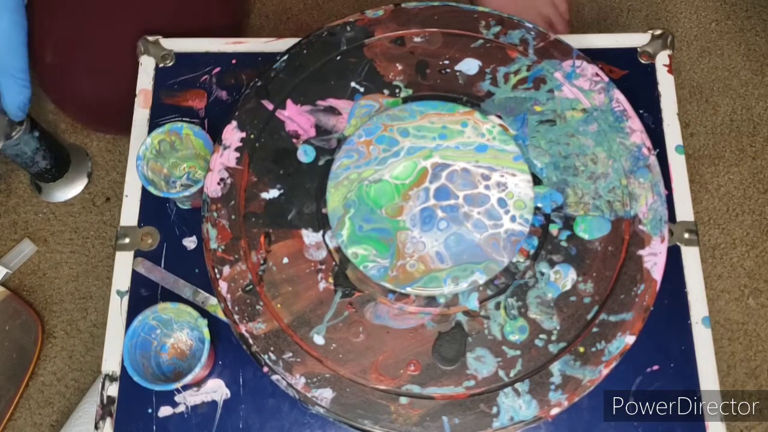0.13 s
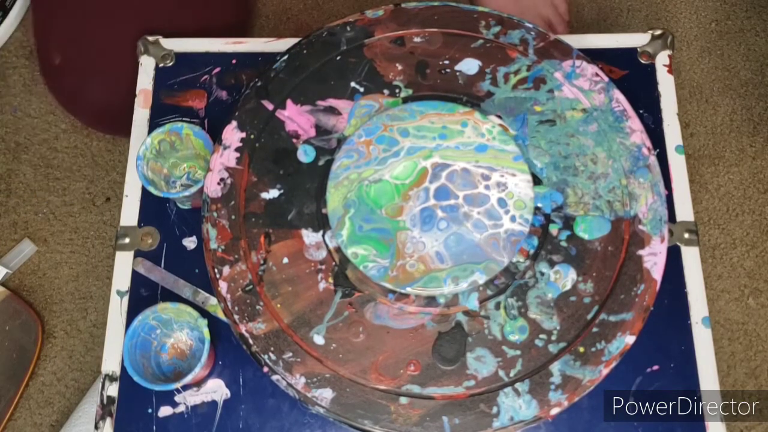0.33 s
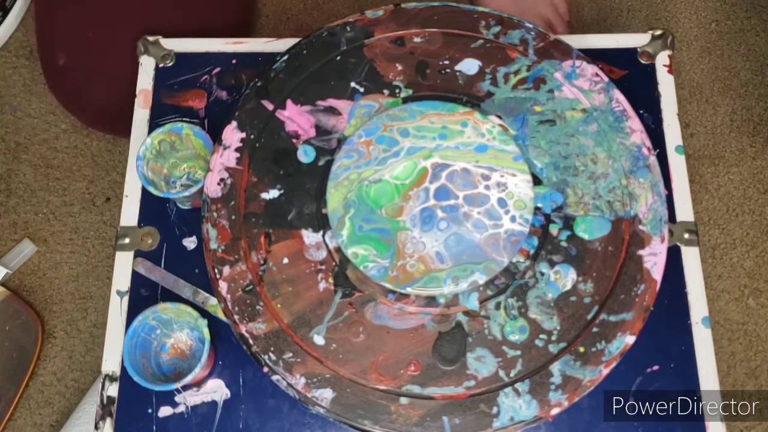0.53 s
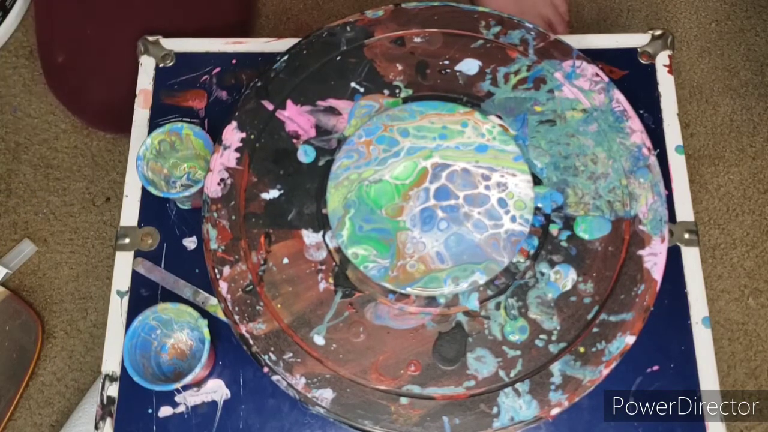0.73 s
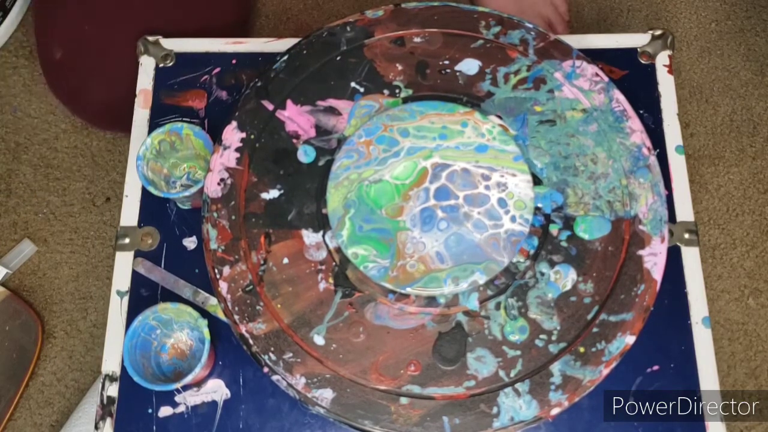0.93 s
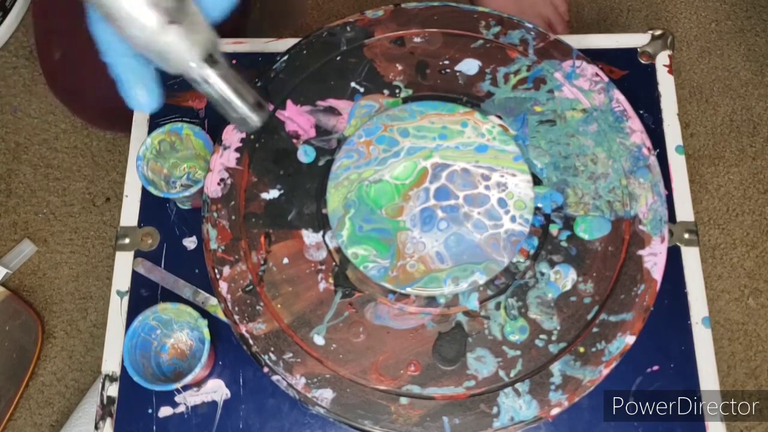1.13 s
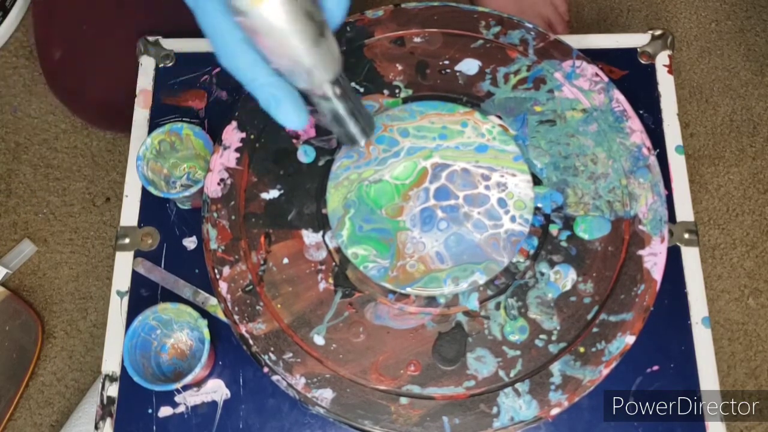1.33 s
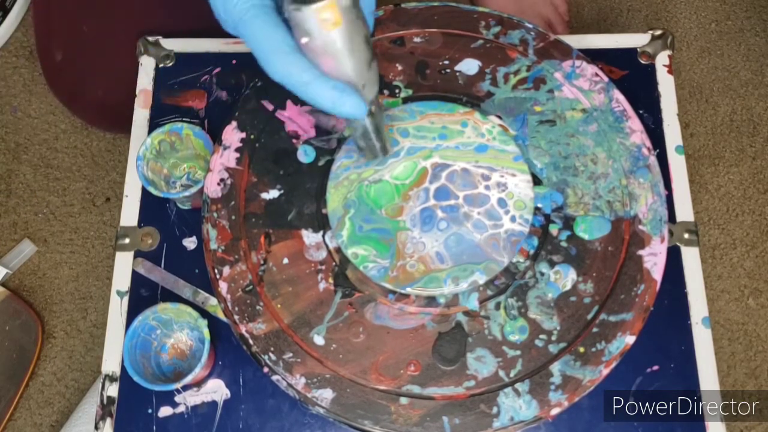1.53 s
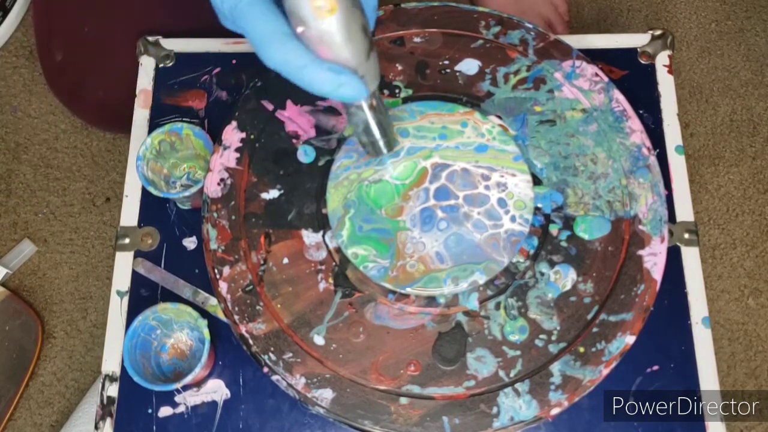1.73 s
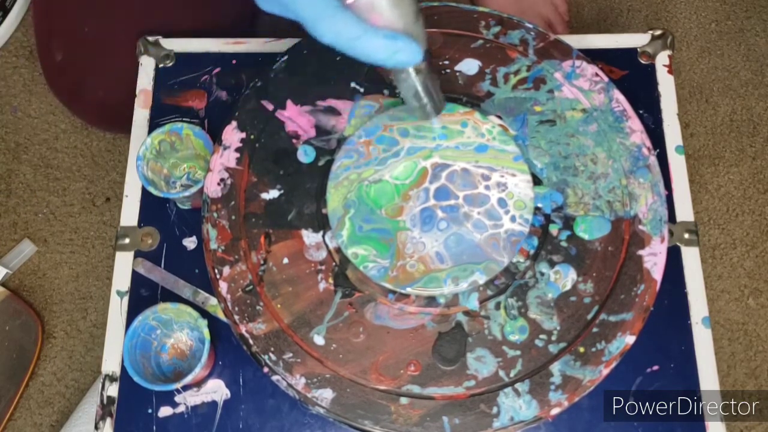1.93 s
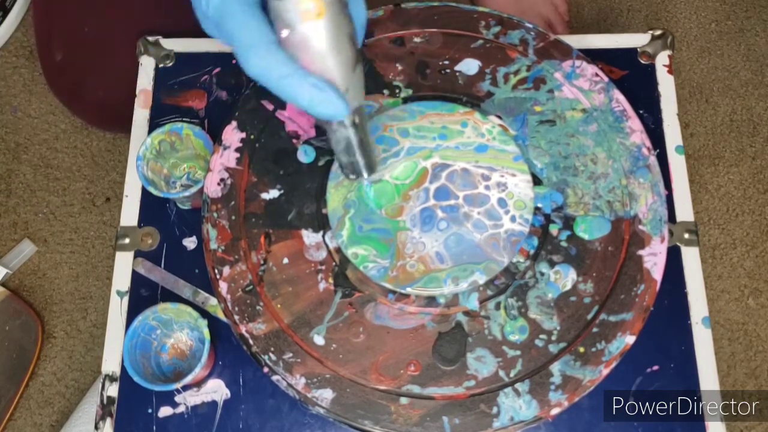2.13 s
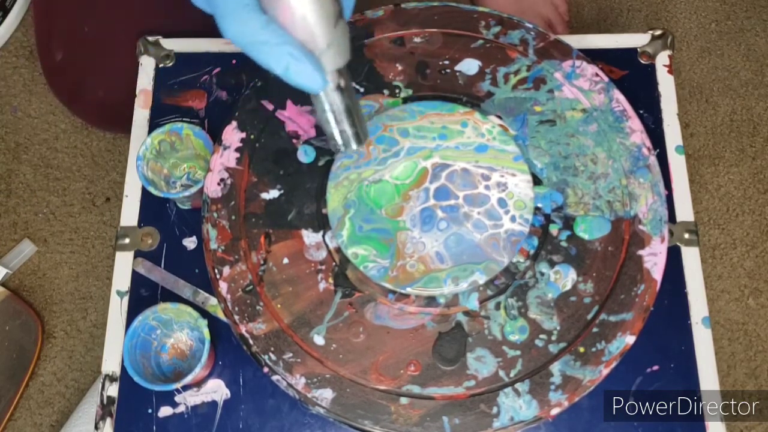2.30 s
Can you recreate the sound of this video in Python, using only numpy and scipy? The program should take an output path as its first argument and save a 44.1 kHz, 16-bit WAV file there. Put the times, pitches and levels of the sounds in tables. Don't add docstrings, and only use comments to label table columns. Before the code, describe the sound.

Gas torch ignition heard close in stereo: quiet handling rustle and tiny ticks first, then gas starts hissing, the igniter cracks loudly, the flame blows briefly and stops with plastic clicks, over faint low room hum.

```python
import sys
import numpy as np
from scipy import signal
from scipy.fft import rfft, irfft, next_fast_len
from scipy.io import wavfile

SR = 44100
rng = np.random.default_rng(int(sys.argv[2]) if len(sys.argv) > 2 else 0)


def gain_from_db(level_db):
    decades = np.asarray(level_db, float) / 20
    return 10 ** decades


def store_wav(level_fs):
    pcm = np.round(np.clip(np.atleast_2d(level_fs), -1, 1) * 32767)
    wavfile.write(sys.argv[1], SR, pcm.T.astype(np.int16))


N = 108574
FFT_N = next_fast_len(N)
T = np.arange(N) / SR

SNAP_S, CATCH_S = 1.7407, 0.026
TRIGGER_PAN_DB = 4.5
# (frequency [Hz], correlation [-1..1])
FLAME_LIKE = [(60, 0.71), (240, 1), (950, 0.92), (3770, 0.21), (15000, -0.19)]
# (frequency [Hz], left over right [dB])
SIDE_LEAN = [(1500, -0.5), (3000, -0.5), (6000, 3.5), (10000, -4.5)]


def rms_one(x):
    return x / np.sqrt(np.mean(x ** 2) + 1e-20)


def in_time(rows):
    s, *columns = np.transpose(rows)
    return [np.interp(T, s, c) for c in columns]


def at_hz(points, hz):
    table_hz, values = np.array(points).T
    return np.interp(np.log(hz), np.log(table_hz), values)


def drift(rate):
    r = np.exp(-80 * np.pi * rate / SR)
    white = rng.standard_normal(N // 40 + 2002)
    slow = signal.lfilter([1], [1, -2 * r, r * r], white)[2000:]
    return np.interp(np.arange(N) / 40, np.arange(len(slow)), rms_one(slow))


def pan(db):
    return gain_from_db(np.array([db / 2, -db / 2]).reshape(2, -1))


def noise(spectrum, like, lean=((1, 0), (2, 0))):
    hz = np.maximum(np.arange(FFT_N // 2 + 1) * SR / FFT_N, 5.)
    mid, side = rfft(rng.standard_normal((2, FFT_N)))
    c = np.clip(at_hz(like, hz), -1, 1)
    pair = np.sqrt(1 + c) * mid + np.sqrt(1 - c) * side * [[1], [-1]]
    coloured = pair * pan(at_hz(lean, hz)) * gain_from_db(at_hz(spectrum, hz))
    return rms_one(irfft(coloured, FFT_N)[:, :N])


def bands(x, low_hz, count):
    hz = np.maximum(np.arange(FFT_N // 2 + 1) * SR / FFT_N, 1.)
    f = rfft(x, FFT_N)
    place = np.clip(np.log2(hz / low_hz), 0, count - 1)
    slices = []
    for k in range(count):
        share = np.maximum(1 - abs(place - k), 0)
        slices.append((low_hz * 2 ** k, irfft(f * share, FFT_N)[:, :N]))
    return slices


def patchy(x, patchy_db, rate):
    shared = drift(rate)
    return sum(b * gain_from_db(patchy_db * (shared + drift(2 * rate)))
               for hz, b in bands(x, low_hz=125., count=8))


def resonate(x, hz, width):
    r = np.exp(-np.pi * width / SR)
    poles = [1, -2 * r * np.cos(2 * np.pi * hz / SR), r * r]
    return signal.lfilter([(1 - r * r) / 2, 0, (r * r - 1) / 2], poles, x)


def rub_tone(white, hz, width):
    return rms_one(resonate(resonate(white, hz, width), hz, width))


def swell_at(s, rise, fall):
    return np.exp(-((T - s) / np.where(T < s, rise, fall)) ** 2)


def ring(x, modes):
    out = 0
    for hz, db, t60 in modes:
        r, w = gain_from_db(-60 / (t60 * SR)), 2 * np.pi * hz / SR
        out = out + gain_from_db(db) * signal.lfilter([0, np.sin(w)], [1, -2 * r * np.cos(w), r * r], x + 1e-18)
    return out


def dying(start, t60):
    t = T - start
    return (t >= 0) * gain_from_db(-60 * np.maximum(t, 0) / t60)


def snap():
    # (frequency [Hz], level per Hz [dB])
    spectrum = [(88, -36), (150, -4), (673, -24), (1180, -8.5), (3390, -4.5), (3590, -7), (9710, -7),
                (12300, -1.5), (15800, 0)]
    # (frequency [Hz], left over right [dB])
    balance = [(60, -6), (550, -1.5), (1100, 4), (2500, 1), (6000, 7), (10000, 0)]
    # (frequency [Hz], correlation [-1..1])
    likeness = [(150, -0.81), (450, 0.9), (1100, 0.67), (2380, -0.053), (15000, -0.087)]
    # (frequency [Hz], decay t60 [s])
    tail_t60 = [(200, 0.33), (1000, 0.23), (3500, 0.28), (12000, 0.2)]
    # (frequency [Hz], level [dB], decay t60 [s], left over right [dB])
    body_modes = [(1530, 3, 0.03, 3), (2900, -6, 0.06, 0), (3660, -5, 0.1, 0), (6190, -9, .03, 7),
                  (7280, 0, 0.03, 8), (7950, -8, .03, 6), (11400, -9, 0.05, -2), (12650, -6, .05, -3),
                  (14800, -3, 0.015, 5)]
    # (time after the snap [s], level [dB])
    rebounds = [
        (.0062, -31),
        (0.0132, -23.5),
        (.0255, -29.5),
    ]
    # (frequency [Hz], level [dB], decay t60 [s])
    spike_modes = [(7400, 0, .012), (14600, -1, .006)]

    colour = noise(spectrum, likeness, balance)
    crack_t60, lead_s = 0.012, 0.0016
    crack = gain_from_db(-17) * dying(SNAP_S, crack_t60) * gain_from_db(1.0 * drift(400.0))
    crack = crack + gain_from_db(-30) * dying(SNAP_S - lead_s, crack_t60)
    crack = crack + sum(gain_from_db(db) * dying(SNAP_S + s, crack_t60) for s, db in rebounds)
    tail = sum(b * dying(SNAP_S, at_hz(tail_t60, hz)) for hz, b in bands(colour, low_hz=115.7, count=8))

    blow = dying(SNAP_S, 0.0013) * (rng.standard_normal(N) + rng.standard_normal((2, N))) / 6
    body = sum(pan(lean) * ring(blow, [mode]) for *mode, lean in body_modes)
    click = np.gradient(dying(SNAP_S + 0.0002, 0.0012))
    spike = gain_from_db(-8) * ring(click, spike_modes) * [[1], [0.3]]

    since = np.maximum(T - SNAP_S, 0)
    rest_hz, glide_hz, glide_s = 47, 205, 0.0032
    cycles = rest_hz * since + glide_hz * glide_s * (1 - np.exp(-since / glide_s))
    thump = np.exp(-(since / [[0.015], [0.028]]) ** 2) * np.sin(2 * np.pi * cycles)
    thump = thump * gain_from_db([[-26.5], [-24.5]]) * [[1], [-1]]
    return crack * colour + gain_from_db(-20.5) * tail + gain_from_db(-21.5) * body + spike + thump


def jet():
    # (time [s], level [dB], left over right [dB])
    valve = [(1.555, -91, 1), (1.568, -67.5, -2), (1.575, -57.5, 4.5), (1.6, -63.5, 3.5),
             (1.635, -59.5, 1.5), (1.684, -51.5, 3.5), (1.73, -48, -0.5), (1.739, -53, 4), (1.76, -47, -6),
             (1.89, -54.5, 3.5), (2.02, -51.5, 5.5), (2.25, -53.5, 5.5), (2.29, -57.5, 7.5),
             (2.40, -88.5, 15.5)]
    # (frequency [Hz], level per Hz [dB])
    cold_colour = [(700, -30), (1500, -8), (2300, -12), (3600, -10.5), (4900, -4), (6500, -5), (7600, -9.5),
                   (9300, -21),
                   (10600, -10.5), (12000, -14), (13900, -9), (15300, -15)]
    # (frequency [Hz], level per Hz [dB])
    hot_colour = [(760, -27), (1300, -7), (3300, -9), (4020, -16.5), (5060, -3), (6100, -9), (7290, -5.5),
                  (8890, -34),
                  (10500, -14), (15800, -22)]
    # (frequency [Hz], width [Hz], share [gain])
    nozzle = [(5050, 750, 0.34), (7420, 700, 1)]

    db, lean = in_time([(1.5, -130, 3.4)] + valve + [(2.46, -120, 4)])
    lit = np.clip((T - SNAP_S) / CATCH_S, 0, 1)
    hot = noise(hot_colour, FLAME_LIKE, SIDE_LEAN)
    whistle = sum(g * gain_from_db(2.5 * drift(4.0)) * resonate(hot, hz, w) for hz, w, g in nozzle)
    hot = rms_one(hot + whistle)
    cold = noise(cold_colour, FLAME_LIKE, SIDE_LEAN)
    gas = (1 - lit) * cold + gain_from_db(0.5) * lit * hot
    return gain_from_db(db) * pan(lean) * patchy(gas, patchy_db=1.5, rate=8.4)


def roar():
    # (frequency [Hz], level per Hz [dB])
    spectrum = [(130, -12), (220, -10.5), (400, -2.5), (620, -4.5), (700, -18), (830, 1), (1080, -4),
                (1500, -21.5), (2600, -28)]
    shut_s, sag_db_per_s, die_db_per_s = 2.282, 12.5, 316
    db = -49 - sag_db_per_s * abs(T - 2.0) - die_db_per_s * np.maximum(T - shut_s, 0)
    lit = np.clip((T - SNAP_S) / CATCH_S, 0, 1)
    flame = patchy(noise(spectrum, FLAME_LIKE), patchy_db=0.5, rate=11.0)
    return lit * gain_from_db(db) * pan(2.5) * flame


def ticks():
    contact_s = [
        .5407,
        1.1556,
        1.1868,
        1.5584,
        1.5728,
        1.6217,
        2.2596,
        2.2768,
    ]
    # (body level [dB], crack level [dB], length [s])
    contacts = [(-82, -60, 0.0025), (-65, -45.5, 0.0035), (-53.5, -73, 0.004), (-73.5, -56.5, 0.0031),
                (-58.5, -55, 0.0029), (-52.5, -86, 0.021), (-37, -50.5, 0.0045), (-35.5, -46, 0.0035)]
    # (frequency [Hz], level [dB], decay t60 [s])
    modes = [(871, -10.5, 0.044), (1294, -2.5, 0.031), (1900, -2, 0.014), (2330, -7, 0.0086),
             (3360, -2, 0.0075), (4100, -7.5, 0.0075), (6100, -1, 0.0048), (7300, -11, .004)]
    # (frequency [Hz], level per Hz [dB])
    echo = [(500, -9), (1300, -6.5), (3300, -11), (7000, -19.5), (15500, -23)]
    # (frequency [Hz], correlation [-1..1])
    echo_like = [(500, .8), (1100, 0.18), (8000, .05)]

    dull, bright, tail = 0, 0, 0
    chatter = rng.standard_normal((2, N)) * gain_from_db(2.0 * drift(500.0))
    chatter[:, (np.array(contact_s) * SR).astype(int) + 2] = 3.5
    for s, (body_db, crack_db, length) in zip(contact_s, contacts):
        burst = (T >= s) * np.exp(-(np.maximum(T - s, 0) / length) ** 2)
        dull = dull + burst * gain_from_db(body_db) * np.sqrt(0.0016 / length)
        bright = bright + burst * gain_from_db(crack_db)
        tail = tail + dying(s + length, 0.2) * gain_from_db(body_db - 14)

    body = sum(ring(dull * chatter[0], [mode]) * (-1) ** k for k, mode in enumerate(modes))
    crack = signal.lfilter([0.8, -0.6], [1], bright * (chatter[0] + 0.43 * chatter))
    x = gain_from_db(-15.5) * body + crack + tail * noise(echo, echo_like)
    high_pass = signal.butter(3, 750, "high", fs=SR, output="sos")
    return pan(TRIGGER_PAN_DB) * signal.sosfilt(high_pass, x)


def rubs():
    # (time [s], level [dB], frequency [Hz], width [Hz], length [s])
    squeaks = [(2.17, -63.5, 1800, 990, .07), (1.575, -61, 6600, 900, 0.0027),
               (1.7, -63, 16000, 1200, .035), (.253, -69, 5600, 250, .012), (0.42, -66, 10900, 570, .012),
               (0.57, -68, 6800, 370, 0.0045), (1.2, -50.5, 6800, 820, .003),
               (1.221, -65, 2280, 410, 0.014), (0.778, -60, 6100, 500, 0.019),
               (.825, -68.5, 1760, 410, 0.041), (0.995, -59, 3240, 450, 0.017),
               (1.04, -59, 3300, 600, 0.019), (1, -66, 6960, 500, 0.022), (1.62, -64, 1320, 180, 0.0052),
               (1.625, -57, 2890, 170, 0.013), (1.626, -63, 1420, 350, .014), (1.66, -61, 1300, 240, 0.013),
               (1.732, -68.5, 1500, 200, .03), (2.03, -54, 5050, 570, 0.095)]
    # (frequency [Hz], correlation [-1..1])
    likeness = [(1000, 0.81), (8000, .3)]
    white = noise([(500, 0.0007), (9000, 0.0017)], likeness)
    return pan(TRIGGER_PAN_DB) * sum(gain_from_db(db) * rub_tone(white, hz, width) * swell_at(s, length, length)
                                     for s, db, hz, width, length in squeaks)


def swish():
    # (peak time [s], level [dB], rise [s], fall [s], crispness [dB])
    strokes = [(0.042, -68, 0.051, 0.083, 4), (0.167, -63.5, 0.061, 0.047, 10.5),
               (.26, -67.5, 0.06, 0.072, 0.5), (.405, -61, 0.047, 0.045, 2.5),
               (0.546, -70, 0.11, 0.075, -8), (0.754, -62, 0.044, 0.053, -18),
               (0.811, -52, 0.035, 0.044, 4), (.89, -63.5, 0.14, 0.15, -14), (0.978, -50, 0.036, 0.074, 5),
               (1.019, -52.5, 0.015, 0.018, -13), (1.081, -59.5, 0.026, 0.078, 0),
               (1.154, -51.5, 0.019, 0.052, 3.5), (1.229, -62, 0.021, 0.088, 1.5),
               (1.455, -77.5, 0.031, 0.047, 6.5)]
    # (frequency [Hz], level per Hz [dB])
    cloth = [(1200, -34), (1700, -24), (2200, -10), (3260, -9), (4300, -8.5), (6950, 0), (9000, -14),
             (15500, -6)]
    # (frequency [Hz], correlation [-1..1])
    cloth_like = [(60, 0.78), (380, 0.65), (2380, 0.013), (15000, 0.0097)]

    soft, crisp = 0, 0
    for s, db, rise, fall, crisp_db in strokes:
        gain = gain_from_db(db) * swell_at(s, rise, fall)
        soft = soft + gain
        crisp = crisp + gain * gain_from_db(crisp_db)
    x = patchy(noise(cloth, cloth_like, SIDE_LEAN), patchy_db=1.74, rate=12.5)
    x = x * gain_from_db(1.0 * drift(300.0))
    crisp_hz, body_hz = 9380, 5161
    high = signal.sosfilt(signal.butter(4, crisp_hz, "high", fs=SR, output="sos"), x)
    low = signal.sosfilt(signal.butter(4, crisp_hz, "low", fs=SR, output="sos"), x)
    body = signal.sosfilt(signal.butter(3, body_hz, "low", fs=SR, output="sos"), low)
    low = low + (gain_from_db(-1.5 + 6 * T) - 1) * body
    return pan(9 - 2 * T) * (soft * low + crisp * high)


def knocks():
    # (time [s], level [dB], frequency [Hz])
    shifts = [
        (0.171, -74.5, 218),
        (0.372, -64.5, 194),
        (0.407, -67.5, 252),
        (1.189, -68.5, 265),
    ]
    white, fall = rng.standard_normal(N), 0.025
    return sum(gain_from_db(db) * rub_tone(white, hz, hz / 2) * swell_at(s, fall / 3, fall) for s, db, hz in shifts)


def room():
    # (frequency [Hz], level per Hz [dB])
    air = [(250, -6.5), (500, -10.5), (1000, -10), (2100, -10), (3500, -22), (7300, -14), (9000, -22),
           (15800, -14.5)]
    rumble_colour = [(12, -46), (20, -14.5), (53, 2), (106, -1), (145, -13.5), (178, -16.5), (343, -25),
                     (700, -51.5), (910, -70.5), (1540, -120)]
    # (frequency [Hz], correlation [-1..1])
    likeness = [(60, 0.92), (115, 0.96), (240, 0.71), (500, 0.27), (1100, 0.058), (3770, 0)]
    # (frequency [Hz], left over right [dB])
    balance = [(55, 5.5), (85, 6), (110, 0), (240, 0.5), (950, 3), (15000, 5.5)]
    # (frequency [Hz], width [Hz], level [dB])
    hum_lines = [(114.67, 3.47, -68), (83.3, 7.6, -68.5), (57.2, 34, -71)]
    # (time [s], rumble level [dB], motor level [dB])
    swells = [(0, 5.5, 4.5), (.3, 3.5, 1.5), (.6, 2.5, 0), (.9, -7, -8), (1.1, -3.5, -3.5),
              (1.25, 3.5, 4.5), (1.6, -1, 3.5), (2.0, 1, 6), (2.3, -0.5, 5), (2.46, -0.5, 1)]

    swell, motor_swell = in_time(swells)
    white = noise([(20, 0), (200, 0)], likeness, balance)
    motor, *hum = [gain_from_db(db) * rub_tone(white, hz, width) for hz, width, db in hum_lines]
    rumble = gain_from_db(-64.5) * noise(rumble_colour, likeness, balance)
    quiet_air = gain_from_db(-75.5) * noise(air, likeness, balance)
    return quiet_air + gain_from_db(swell) * (sum(hum) + rumble) + gain_from_db(motor_swell) * motor


def scene():
    return snap() + jet() + roar() + ticks() + rubs() + swish() + knocks() + room()


def band_limit(x):
    return signal.sosfilt(signal.butter(12, 16900, fs=SR, output="sos"), x)


def record(dry):
    top_cut = signal.ellip(10, 0.5, 45, 15450, fs=SR, output="sos")
    mix = signal.sosfilt(top_cut, dry)
    return band_limit(mix)


dry = scene()
out = record(dry)
store_wav(out)
```